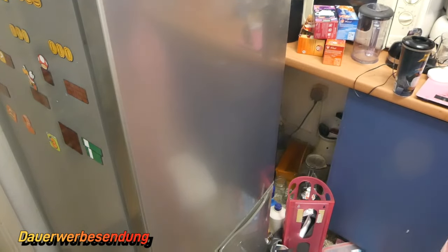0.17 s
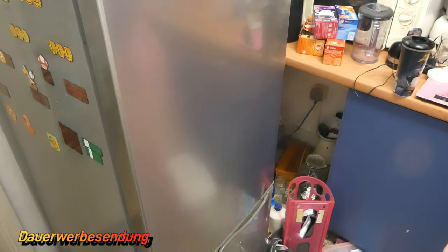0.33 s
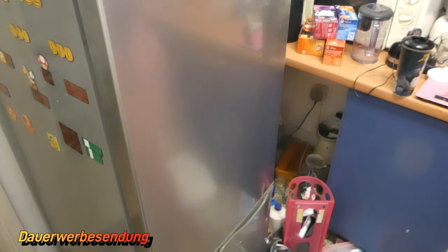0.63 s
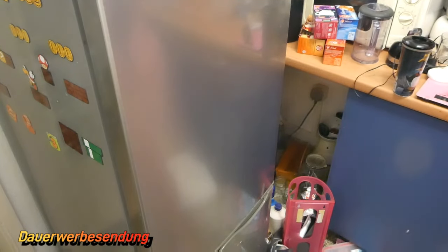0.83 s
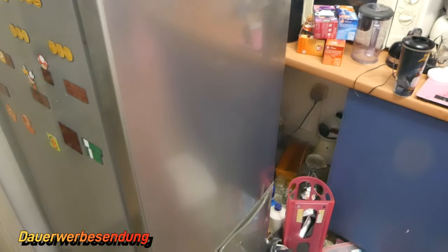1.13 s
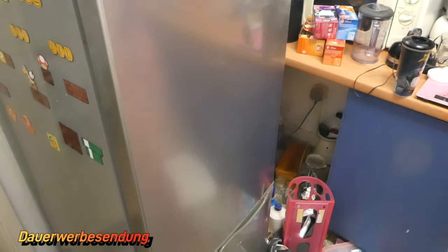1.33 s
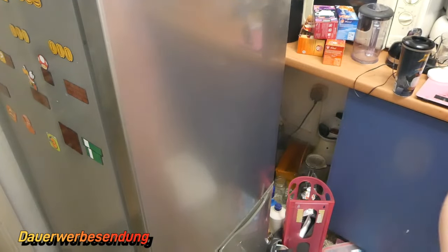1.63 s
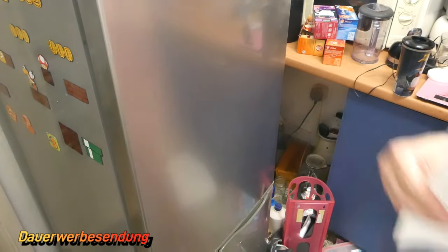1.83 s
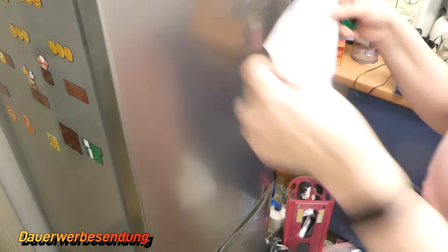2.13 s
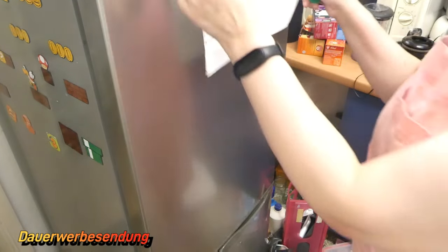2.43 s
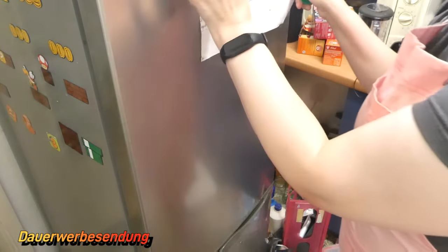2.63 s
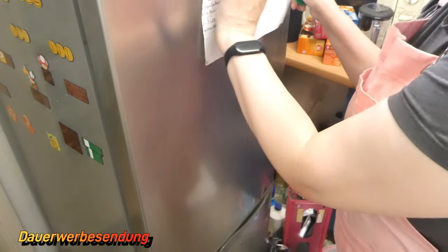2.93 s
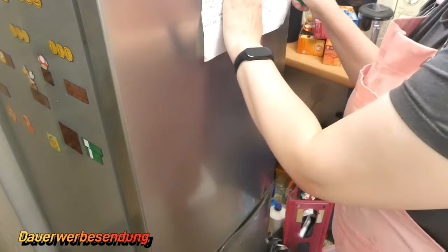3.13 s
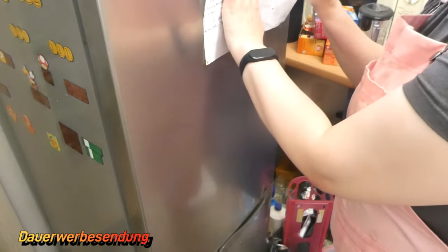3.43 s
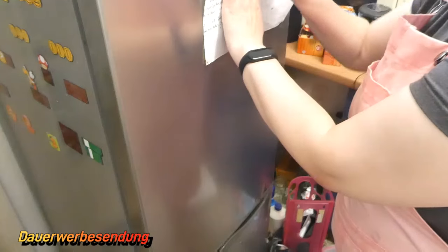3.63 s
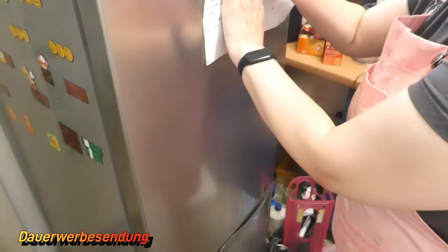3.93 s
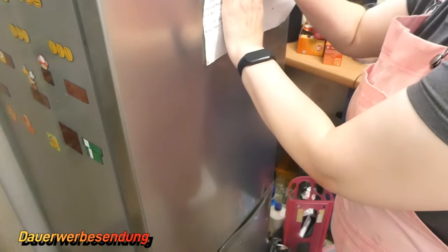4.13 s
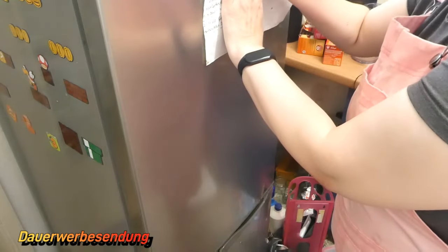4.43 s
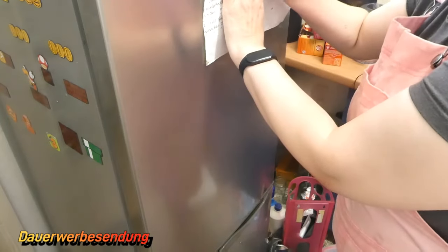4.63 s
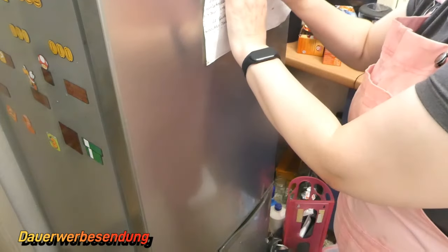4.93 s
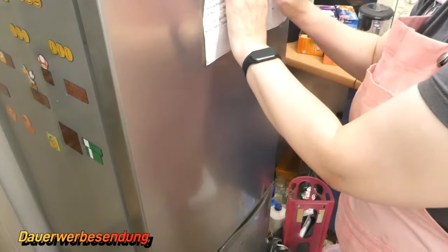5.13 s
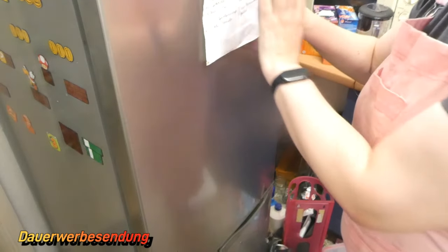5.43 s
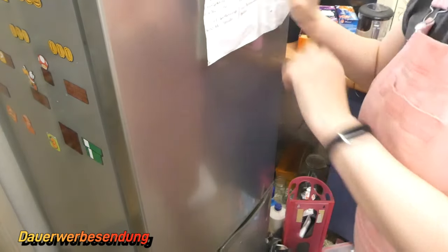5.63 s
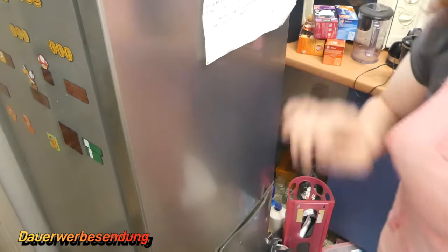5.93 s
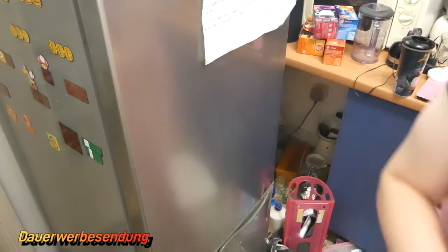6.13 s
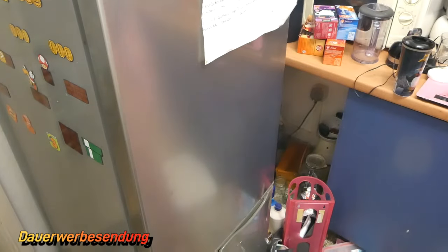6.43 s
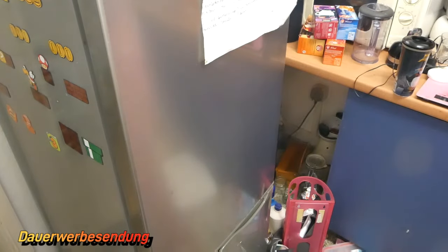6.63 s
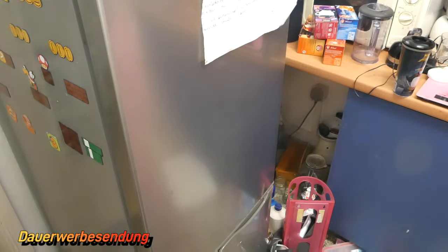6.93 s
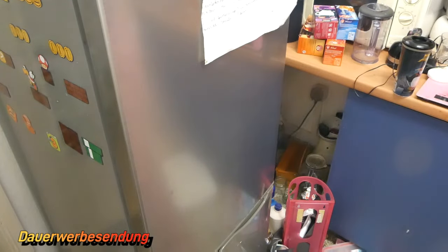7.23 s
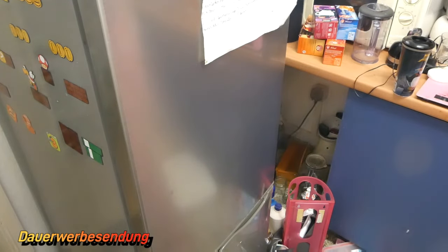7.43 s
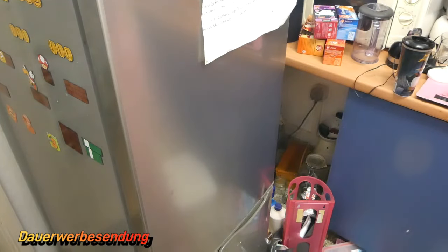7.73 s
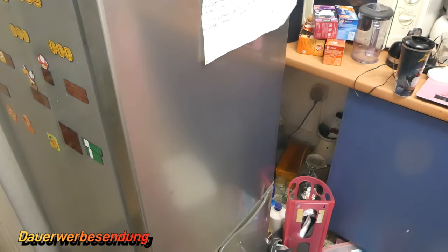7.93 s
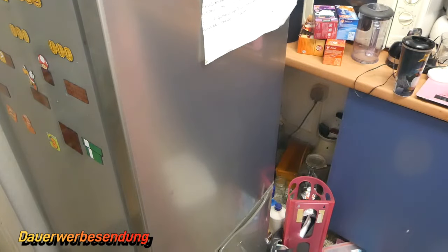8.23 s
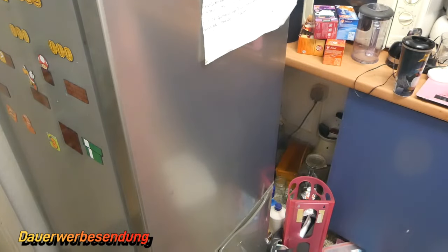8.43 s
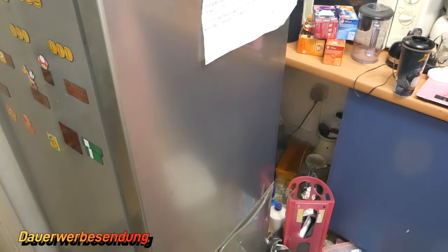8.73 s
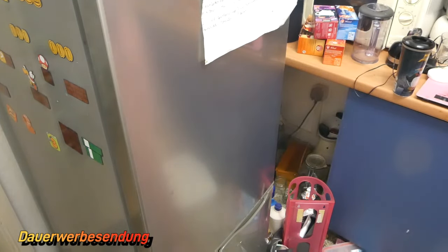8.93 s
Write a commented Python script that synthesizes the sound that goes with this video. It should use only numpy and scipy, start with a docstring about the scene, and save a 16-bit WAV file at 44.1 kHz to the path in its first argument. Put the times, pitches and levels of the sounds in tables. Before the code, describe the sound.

A faint, low, steady hiss fills a small hard-walled kitchen with a short, bright reverberation. At 0-0.25 s something scrapes briefly over the worktop; soft knocks follow at about 0.5 and 0.65 s, then several between 1.4 and 2.4 s. From 1.7 to 2.5 s a sheet of paper rustles, with dry ticks and hollow plips close to the microphone. Hand strokes smooth it from 2.5 to 3.4 s, with sharp ticks; at 3.9 s a magnet claps on the steel door. Faint strokes continue to 5.3 s, then clothes rub softly around 5.7 s. At 6.6 s a large hollow box slides and bangs loudly, clattering with a pitched bowl knock at 6.8 s, and slams hardest at 7.23 s with a dull thump. Thin plastic crinkles, small knocks fall around 7.7-8.2 s, and ringing box blows return from 8.4 to 9 s.

```python
"""A small, hard-walled kitchen, over a faint steady hiss. First something is dragged briefly over the worktop
and small things are knocked or set down. A sheet of paper is carried to the fridge door, smoothed by hand and
pinned with a clapping magnet, with dry ticks close to the microphone. Clothes rustle; then, off to one side, a
large hollow box (a bin or drawer) slides, clatters, slams once, a plastic bag rustles and it clatters again.
Streams of random slips make the rubbing; bursts of contacts, damped modes and room tails make the blows."""
import sys
import numpy as np
from scipy import signal
from scipy.fft import rfft, irfft
from scipy.io import wavfile
from scipy.ndimage import uniform_filter1d

SR = 44100
rng = np.random.default_rng(int(sys.argv[2]) if len(sys.argv) > 2 else 0)


def output_pcm(signal):
    """Save a mono or channel-first signal as 16-bit PCM at the path in sys.argv[1].

    Samples are clipped to [-1, 1] before scaling.
    """
    pcm = np.clip(np.atleast_2d(signal).T, -1, 1) * 32767
    wavfile.write(sys.argv[1], SR, np.round(pcm).astype(np.int16))


N = 399987
SIZE = 32768  # length of one event or room tail (samples)
AGE = np.arange(SIZE) / SR  # time since the event began (s)
FREQ = np.fft.rfftfreq(SIZE, 1 / SR)
TOP_HZ = 15300

# All spectra and mode levels are relative. Modes are later detuned and scattered in level at random,
# and those above 2600 Hz die sooner than listed.

# corners of the lean: low end, boom, body, presence, treble: (frequency [Hz])
LEAN_HZ = (70, 200, 800, 2200, 7000)
# band in which the level of a rustle is set: (lowest [Hz], highest [Hz])
TREBLE_HZ = (7500, 14000)
# reverberation of the kitchen: (frequency [Hz], t60 [s])
ROOM = [(140, 0.75), (300, 0.58), (800, 0.36), (2300, 0.45), (5500, 0.49), (12000, 0.19)]

# hiss common to both sides: (frequency [Hz], level [dB])
HISS_MID = [(18, -50), (30, -21), (110, -9), (267, 1.5), (524, -3), (978, -11.5), (1200, -11.5),
            (1780, -9.5), (2030, -7.5), (2310, -15), (2490, -10.5), (3880, -18), (8040, -20), (9640, -17.5),
            (15000, -28)]
# hiss opposed between the sides: (frequency [Hz], level [dB])
HISS_SIDE = [(18, -61), (30, -29), (59, -20.5), (195, -1), (304, 0.5), (597, -4.5), (1440, -16),
             (2030, -18.5), (3410, -27.5), (5300, -31), (7830, -35.5), (10200, -32.5), (15000, -38.5)]
# narrow whistling bands in the hiss: (frequency [Hz], width [Hz], level [dB])
HISS_PEAKS = [(2024, 120, 0.5), (2485, 89, 0.5), (2880, 60, -3)]

# something dragged over the worktop: (time [s], level [dB])
DRAG = [(0, -51), (.04, -51), (.085, -45.5), (.125, -47), (.155, -42.5), (.19, -48), (.24, -58.5),
        (.4, -76)]
# what it radiates, with one strong resonance: (frequency [Hz], level [dB])
DRAG_TONE = [(80, -34), (140, -7.5), (260, -14), (620, -7.5), (780, -1), (930, -8.5), (1700, -10),
             (2900, -21), (4000, -34), (6000, -32), (6700, -27), (7800, -52)]

# small things knocked or set down: (time [s], level [dB], chatter [s], body [dB], treble [dB])
KNOCKS = [(0.522, -41, .024, -1, -9.5), (0.641, -40, 0.017, -1, -4.5), (1.387, -38, 0.003, 0.5, 3),
          (1.644, -41.5, 0.0023, 0.5, -10.5), (1.767, -41, 0.016, 7, 3), (1.822, -43.5, 0.029, 0, -7),
          (1.975, -46, 0.029, 5, -1), (2.017, -44.5, 0.0041, -15, -17), (2.288, -36, 0.0083, -7, -10.5),
          (2.354, -51.5, 0.0069, 6, -18), (6.814, -34.5, 0.00538, 3, 4), (7.692, -44, 0.0053, 14, -5),
          (7.856, -44, 0.0028, 11, -1), (8.051, -40, 0.0015, -3, -3), (8.18, -43.5, 0.0087, -6.5, -16)]
# what they radiate: (frequency [Hz], level [dB])
KNOCK_TONE = [(105, -35.5), (140, -2.5), (210, -8.5), (320, -2), (510, 1), (810, 0), (1220, -2.5),
              (1770, 0.5), (2470, -3), (3490, -8.5), (5020, -16), (6930, -15.5), (9380, -30), (12850, -28)]
# their boom (dB), the share of the body that it follows, the crack over the room (dB)
KNOCK_BOOM_DB, BOOM_SHARE, KNOCK_CRACK_DB = -5.5, 1, -8

# close, dry ticks and hollow plips: (time [s], peak [dB], pitch [Hz], width [Hz])
TICKS = [(1.333, -41, 420, 300), (1.453, -37.5, 582, 25), (1.898, -33, 580, 100), (2.017, -28.5, 2310, 900),
         (2.679, -34.5, 410, 130), (2.758, -32, 2000, 1000), (2.865, -30.5, 8500, 5000),
         (2.895, -30, 2160, 1100), (3.15, -32, 2100, 1200), (3.361, -31.5, 3750, 3000),
         (3.887, -32, 4750, 2500), (3.888, -28.5, 9750, 4000), (4.953, -39.5, 9500, 5000),
         (5.112, -43, 607, 75), (6.171, -43, 562, 36)]

# what rubbing surfaces radiate: (frequency [Hz], level [dB])
SWISH_TONE = [(105, -29), (140, -17), (210, 0.5), (320, -8), (510, -1.5), (810, -11.5), (1220, -5.5),
              (1770, -2.5), (2470, 1), (3490, -2.5), (5020, -4), (6930, -5.5), (9380, -0.5), (12850, -9)]
# the sheet carried to the door: (time [s], level of its treble before a gain [dB])
CARRY = [(1.72, -65), (1.784, -53.5), (1.934, -59), (2.002, -56), (2.266, -59), (2.322, -56), (2.53, -73)]
# hand strokes over the paper: (time at the middle [s], level there [dB], half length [s], treble [dB])
STROKES = [(2.576, -53, 0.036, -9), (2.737, -49.5, 0.054, -11.5), (2.855, -39, 0.016, -7),
           (2.988, -46, 0.027, 4), (3.098, -45.5, 0.03, 14), (3.163, -42.5, 0.028, -4.5),
           (3.255, -48, 0.019, 8), (3.353, -45, 0.036, -2.5), (3.796, -61, 0.033, 21),
           (4.303, -61, .02, 15), (4.535, -57, 0.054, 6), (4.967, -64, .015, 23), (5.327, -57, .03, 11)]
# softer strokes are given more boom and body, louder ones less: lean of a usual stroke (dB)
# and its fall (dB per dB of level)
USUAL_STROKE_DB, STROKE_BOOM_DB, STROKE_BODY_DB, STROKE_FALL = -48, 3.5, 2, 1
# the magnet slapping onto the steel door through the paper: (frequency [Hz], level [dB])
MAGNET_TONE = [(53, -65), (90, -52), (233, -4), (412, -15), (477, -16), (542, -7), (728, -2.5), (809, -15),
               (999, 1), (1210, -7), (1290, 0), (2050, -6.5), (3470, -28.5), (10600, -22.5), (14000, -28)]
# clothes as the person turns away: (time [s], level of their treble before a gain [dB])
CLOTHES = [(5.42, -73), (5.64, -64.5), (5.668, -62), (5.688, -62.5), (6.52, -74)]

# the bag stirred, pulled about, then settling: (time [s], level of its treble before a gain [dB])
BAG = [(6.839, -63), (6.93, -58), (7.45, -56), (7.682, -56.5), (7.9, -47), (7.97, -52), (8.24, -52.5),
       (8.31, -42), (8.41, -43.5), (8.48, -59.5), (8.72, -62.5), (9.06, -57.5)]
# creases of the bag: lowest and highest pitch (Hz), time to the crest of a click's envelope (s),
# crest above the bag's curve and its spread (dB)
CREASE_LOW_HZ, CREASE_HIGH_HZ, CREASE_S, CREASE_DB, CREASE_SPREAD_DB = 1030, 3900, 0.00026, 16, 1

# a bowl jolted during the clatter: (frequency [Hz], level [dB], t60 [s])
BOWL_MODES = [(392, -1, 0.26), (920, -3, 0.29), (1710, -6, 0.27)]

# the box sliding just before its first blow: (time [s], level of its treble before a gain [dB])
SLIDE = [(6.55, -72), (6.59, -53.5), (6.62, -59)]
# blows on the box; boom is the extra low-end weight of each blow, up or down:
# (time [s], level [dB], chatter [s], boom [dB])
BOX_BLOWS = [(6.594, -19, 0.034, 0.5), (6.701, -32.5, 0.018, 6), (6.75, -32, 0.013, 3),
             (6.901, -23.5, .018, 0), (6.953, -34, 0.01, 4), (7.008, -35.5, .008, -3),
             (7.039, -22, .008, 2), (7.141, -25, .028, -1.5), (7.234, -14.5, 0.001596, -7.5),
             (7.541, -41.5, 0.002, -2), (8.38, -28.5, 0.0035, -7), (8.404, -18.5, .022, 4),
             (8.514, -32, 0.028, 1), (8.756, -32, 0.0071, -3.5), (8.86, -41, 0.00195, -4.5),
             (8.942, -35, 0.012, -8.5), (9.013, -32.5, 0.014, 0)]
# what the box radiates: (frequency [Hz], level [dB])
BOX_TONE = [(45, -53), (105, -26), (140, -7), (210, -3), (320, -4.5), (510, -2.5), (810, 1.5), (1220, -2),
            (1770, -1), (2470, -3), (3490, -11.5), (5020, -16), (6930, -26.5), (9380, -24), (12850, -34.5)]
# ringing of the box and its contents: (frequency [Hz], level [dB], t60 [s])
BOX_MODES = [(143.4, 11, 0.79), (191.6, 7, 0.63), (266.8, 5, 0.39), (325, 6, 0.67), (764, 0.5, 0.63),
             (795, -5.5, 0.74), (865, 5.5, 0.26), (1003, 4, 0.54), (1098, 7.5, 0.24), (1182, 6.5, 0.26),
             (1380, -23, 0.48), (1744, -11, 0.16), (1835, 7.5, 0.14), (2115, 6, 0.45), (2310, 5, 0.79),
             (2460, 6, 0.26), (2980, -11, 0.33), (3135, 11, 0.82), (3320, 15.5, 1), (3700, 9, 0.94),
             (3870, 12, 1), (4160, 18, 0.61), (4400, 5, 1), (5180, 5, 0.82)]
# a metal part on the box that sings on after each blow: (frequency [Hz], level [dB], t60 [s])
METAL_MODES = [(2363, 2, 0.16), (2450, 1, 0.5), (2460, 1, 0.8), (2555, -2.5, 0.45), (2530, -15, 0.72),
               (2800, -24, 0.69)]
# left over right for the box: (frequency [Hz], difference [dB])
BOX_BALANCE = [(200, 2), (400, -0.2), (700, -3), (1300, -3), (4400, -0.5), (12000, 0)]
# a blow of middling strength: its level, its boom, body and treble, and its crack over the room (dB)
MIDDLING_DB, BOX_BOOM_DB, BOX_BODY_DB, BOX_TREBLE_DB, BOX_CRACK_DB = -30.5, 3, -1, -5.5, -16.5
# a harder blow has a shorter contact: less boom and body, more treble and crack,
# and it shakes the metal part more (all dB per dB of strength)
BOOM_FALL, BODY_FALL, TREBLE_RISE, CRACK_RISE, METAL_RISE = 0.8, 0.31, 0.3, 0.71, 0.25
# loose things in the box: lowest and highest pitch (Hz), ring time (s), relative level (dB)
LOOSE_LOW_HZ, LOOSE_HIGH_HZ, LOOSE_T60_S, LOOSE_DB = 330.3, 4420, 0.28, -22.5


def undb(db):
    """Decibels to gain."""
    return 10 ** (np.asarray(db) / 20)


def rms(x):
    """Root mean square, kept above zero."""
    return np.sqrt(np.mean(x ** 2)) + 1e-12


def read(points, hz):
    """A table of (frequency [Hz], value) joined on a log-frequency axis."""
    f, value = np.transpose(points)
    return np.interp(np.log(np.maximum(hz, 1)), np.log(f), value)


def tone(points, boom_db, body_db, treble_db):
    """A spectrum in dB, leaned towards boom, body or treble."""
    lean = list(zip(LEAN_HZ, (0, boom_db, body_db, 0, treble_db)))
    return read(points, FREQ) + read(lean, FREQ)


def colour(x, db):
    """Causal (minimum-phase) filter with the given gain, so that attacks stay sharp."""
    cepstrum = irfft(np.log(undb(db)))
    cepstrum[1:SIZE // 2] *= 2
    cepstrum[SIZE // 2 + 1:] = 0
    return irfft(rfft(x) * np.exp(rfft(cepstrum)))


def stereo(mid, side):
    """Left and right from what they share and what opposes them."""
    return np.array([mid + side, mid - side])


def add(out, s, x):
    """Mix a sound in at a time, cut to the length of the scene."""
    start = int(s * SR)
    lo, hi = max(start, 0), min(start + x.shape[-1], N)
    out[:, lo:hi] += x[..., lo - start:hi - start]


def loudness(x, db):
    """Scale a blow so that its first twentieth of a second has this level."""
    return x * undb(db) / rms(x[:, :SR // 20])


def room_tail(side_low=.38, side_mid=0.33, side_high=0.5):
    """Dense reflections of unit energy: lows linger, the treble differs most between the two sides."""
    width = read([(300, side_low), (2000, side_mid), (11000, side_high)], FREQ)
    mid, side = rfft(rng.standard_normal((2, SIZE)))
    field, tail = stereo(mid, width * side), 0
    centres, t60s = np.transpose(ROOM)
    # each row of the identity picks one band, which overlaps its neighbours
    for share, t60 in zip(np.eye(len(ROOM)), t60s):
        band = irfft(field * read(list(zip(centres, share)), FREQ))
        tail = tail + band * np.exp(-np.log(1000) * AGE / t60)
    return tail / (rms(tail) * np.sqrt(SIZE))


def in_room(close, room_db):
    """The close sound plus its reflections from the kitchen."""
    return close + undb(room_db) * signal.fftconvolve(close, room_tail(), axes=1)[:, :N]


def contacts(chatter_s, count=7, first=1.0):
    """A first touch and a few bounces scattered through the chatter time; unit energy."""
    when, size = rng.random((2, count))
    when = (np.arange(count) + when) / count * max(chatter_s, 0)
    size = (.5 + size) * rng.choice([-1, 1], count)
    when[0], size[0] = 0, first
    force = np.bincount((when * SR).astype(int), size, SIZE)[:SIZE]
    return force / np.linalg.norm(force)


def blow(chatter_s, crack_db, crack_s=0.0029, build_s=0.0027, shadow_hz=5000):
    """Each contact sends a short crack to the microphone and adds its energy to the room."""
    force = contacts(chatter_s)
    crack = rng.standard_normal(SIZE) * np.exp(-AGE / crack_s)
    cracks = irfft(rfft(force) * rfft(crack))
    # the top of the crack is shadowed and arrives only by way of the walls
    direct = colour(cracks, -10 * np.log10(1 + (FREQ / shadow_hz) ** 4))
    filling = np.sqrt(np.cumsum(force ** 2)) * (1 - np.exp(-AGE / build_s))
    x = undb(crack_db) * direct / np.linalg.norm(direct) + filling * room_tail()
    return x / (rms(x) * np.sqrt(SIZE))


def ringing(modes, detune=0.00366, scatter_db=2.54):
    """Damped modes; the pitch and level of each are scattered at random on every call."""
    hz, db, t60 = np.transpose(modes)
    t60 = t60 * np.minimum(1, 2600 / hz) ** 2  # losses grow quickly in the treble
    shift, share = rng.standard_normal((2, len(hz)))
    phase = np.outer(2 * np.pi * hz * (1 + detune * shift), AGE).astype(np.float32)
    decay = np.maximum(np.outer(-np.log(1000) / t60, AGE), -20).astype(np.float32)
    rings = np.sin(phase) * np.exp(decay)
    # before the scatter, a mode at 0 dB has unit energy
    size = undb(db + scatter_db * share) * rng.choice([-1, 1], len(hz)) / np.linalg.norm(rings, axis=1)
    return np.einsum("m,mt->t", size, rings)


def slips(size, grain_db, side, top_spread=0.21):
    """Countless tiny slips of uneven size, spread between left and right, most widely in the top treble."""
    mid, opposed = rng.standard_normal((2, size)) * undb(grain_db * rng.exponential(size=size))
    return stereo(mid, side * (opposed - top_spread * np.roll(opposed, 1)))


def rustle(curve, boom_db, body_db, treble_db, grain_db, side, gain_db,
           catch_db=1.2, catch_s=.012, fade_s=0.0033):
    """A surface in motion: a stream of slips follows the curve, catching and freeing itself at random."""
    f, t = np.fft.rfftfreq(N, 1 / SR), np.arange(N) / SR
    gain = undb(np.interp(f, FREQ, tone(SWISH_TONE, boom_db, body_db, treble_db)))
    spectrum = rfft(slips(N, grain_db, side)) * gain
    treble = irfft(spectrum.mean(axis=0) * (f > TREBLE_HZ[0]) * (f < TREBLE_HZ[1]), N)
    catches = catch_db * rng.standard_normal(N)[(t / catch_s).astype(int)]
    level = np.interp(t, *np.transpose(curve), left=-np.inf, right=-np.inf)
    motion = undb(gain_db + catches + level)
    return irfft(spectrum, N) / rms(treble) * uniform_filter1d(motion, int(fade_s * SR) + 1)


def hiss(mid_db=-59.0, side_db=-51.0, whistle_db=-66):
    """Steady background of shaped noise: a wide low rush, a thin hiss and a few narrow bands."""
    f = np.fft.rfftfreq(N, 1 / SR)
    peaks = sum(undb(db) / (1 + (2 * (f - hz) / width) ** 2) for hz, width, db in HISS_PEAKS)
    shapes = np.array([undb(read(HISS_MID, f)), undb(read(HISS_SIDE, f)), peaks, peaks])
    noises = irfft(rfft(rng.standard_normal((4, N))) * shapes, N)
    mid, side, left, right = (x / rms(x) for x in noises)
    whistles = undb(whistle_db) * np.array([left, right])
    return stereo(undb(mid_db) * mid, undb(side_db) * side) + whistles


def clothes():
    """Cloth rubs on cloth: a soft stream of slips, weak in treble."""
    return rustle(CLOTHES, boom_db=9, body_db=5.5, treble_db=-10.0, grain_db=1.4, side=0.47, gain_db=-1.6)


def drag(grain_db=-2.5, side=0.41):
    """Stick and slip: a stream of uneven clicks rings the dragged thing."""
    clicks = rng.standard_normal((2, SIZE)) * undb(grain_db * rng.exponential(size=SIZE))
    x = colour(stereo(clicks[0], side * clicks[1]), read(DRAG_TONE, FREQ))
    out = np.zeros((2, N))
    add(out, 0, x / rms(x) * undb(np.interp(AGE, *np.transpose(DRAG), right=-np.inf)))
    return out


def knocks(pan_db=-2):
    """Small, well damped things: a crack or short rattle, and the room does the rest."""
    out = np.zeros((2, N))
    for s, db, chatter_s, body_db, treble_db in KNOCKS:
        touch = tone(KNOCK_TONE, KNOCK_BOOM_DB + BOOM_SHARE * body_db, body_db, treble_db)
        add(out, s, loudness(colour(blow(chatter_s, KNOCK_CRACK_DB), touch), db))
    return out * undb([[pan_db / 2], [-pan_db / 2]])  # left over right


def ticks(snap_s=0.0033, room_db=-10):
    """A tiny snap rings one resonance: wide for a paper tick, narrow for a plip."""
    out = np.zeros((2, N))
    for s, db, hz, width_hz in TICKS:
        snap = rng.standard_normal(SIZE) * np.exp(-AGE / snap_s)
        ring = np.cos(2 * np.pi * hz * AGE) * np.exp(-np.pi * width_hz * AGE)
        # a small source radiates little bass
        x = irfft(rfft(snap) * rfft(ring) * FREQ / (FREQ - 1j * hz / 2))
        x = irfft(rfft(x) / (1 + 1j * FREQ / (2 * hz)))  # nor much far above its resonance
        add(out, s, x * undb(db) / np.abs(x).max())
    return in_room(out, room_db)


def carried_sheet():
    """The carried sheet rustles as a stream of grainy slips."""
    return rustle(CARRY, boom_db=-12, body_db=9, treble_db=-6, grain_db=2.4, side=0.56, gain_db=-4.5)


def strokes(grain_db=2.0, side=0.35):
    """Paper slides on the door: the slips swell and fade with each stroke of the hand."""
    out, middle = np.zeros((2, N)), AGE[-1] / 2
    for s, db, half_s, treble_db in STROKES:
        softness = STROKE_FALL * (USUAL_STROKE_DB - db)
        touch = tone(SWISH_TONE, STROKE_BOOM_DB + softness, STROKE_BODY_DB + softness, treble_db)
        x = colour(slips(SIZE, grain_db, side), touch)
        swell = np.exp(-.5 * ((AGE - middle) / half_s) ** 2)
        add(out, s - middle, x * undb(db) / rms(x) * swell)
    return out


def magnet(db=-31.5, chatter_s=.011, crack_db=-2):
    """The magnet claps on the door panel in a short burst of contacts, with the room's reply."""
    out = np.zeros((2, N))
    clap = loudness(colour(blow(chatter_s, crack_db), read(MAGNET_TONE, FREQ)), db)
    add(out, 3.896, clap)
    return out


def bowl(db=-33.0):
    """One short, pitched knock amid the clatter, from a few damped modes."""
    out = np.zeros((2, N))
    ring = loudness(np.tile(ringing(BOWL_MODES), (2, 1)), db)
    add(out, 6.815, ring)
    return out


def bag():
    """Thin plastic rubs on itself: a stream of slips that follows the stirring."""
    return rustle(BAG, boom_db=-2, body_db=5.5, treble_db=-2.5, grain_db=1.76, side=0.55, gain_db=-0.1)


def creases(count=110, room_db=2):
    """Creases snap at random moments, as loud as the bag is stirred: each is a click of about one cycle."""
    out, age = np.zeros((2, N)), AGE[:SR // 50]
    times, levels = np.transpose(BAG)
    for (when, pitch), size in zip(rng.random((count, 2)), rng.standard_normal(count)):
        s = times[0] + when * (times[-1] - times[0])
        hz = CREASE_LOW_HZ * (CREASE_HIGH_HZ / CREASE_LOW_HZ) ** pitch
        db = np.interp(s, times, levels) + CREASE_DB + CREASE_SPREAD_DB * size
        envelope = age / CREASE_S * np.exp(1 - age / CREASE_S)
        add(out, s, undb(db) * np.sin(2 * np.pi * hz * age) * envelope)
    return in_room(out, room_db)


def sliding_box():
    """The box starts to slide: a stream of slips, strong in the body."""
    return rustle(SLIDE, boom_db=-3, body_db=13.5, treble_db=-9.5, grain_db=4.5, side=.4, gain_db=2.7)


def swishes(room_db=-9):
    """All that rubs (paper, clothes, sliding box and bag) excites the same room."""
    return in_room(carried_sheet() + strokes() + clothes() + sliding_box() + bag(), room_db)


def loose_things(count=14):
    """Things loose in the box: a random handful of briefly ringing modes, different on each blow."""
    hz = LOOSE_LOW_HZ * (LOOSE_HIGH_HZ / LOOSE_LOW_HZ) ** rng.random(count)
    return ringing([(f, LOOSE_DB, LOOSE_T60_S) for f in hz])


def box(ring_db=-27, damping_db=-9, metal_db=-24, body_share=0.5):
    """The hollow box chatters, brighter when hit harder; walls and contents ring, a metal part sings on."""
    out = np.zeros((2, N))
    lean = read(BOX_BALANCE, FREQ) / 2
    damping = undb(read([(2000, 0), (3500, damping_db)], FREQ))  # the walls radiate their high modes poorly
    for s, db, chatter_s, boom_db in BOX_BLOWS:
        strength = db - MIDDLING_DB
        boom = BOX_BOOM_DB - BOOM_FALL * strength + boom_db
        body = BOX_BODY_DB - BODY_FALL * strength + body_share * boom_db
        touch = tone(BOX_TONE, boom, body, BOX_TREBLE_DB + TREBLE_RISE * strength)
        walls = undb(ring_db) * irfft(rfft(ringing(BOX_MODES)) * damping)
        metal = undb(metal_db + METAL_RISE * strength) * ringing(METAL_MODES)
        clatter = blow(chatter_s, BOX_CRACK_DB + CRACK_RISE * strength)
        x = colour(clatter + walls + metal + loose_things(), touch)
        placed = irfft(rfft(x) * undb([lean, -lean]))
        add(out, s, loudness(placed, db))
    return out


def scene():
    """Everything in the kitchen, from the background to the box."""
    return hiss() + drag() + knocks() + ticks() + swishes() + magnet() + bowl() + creases() + box()


def record(dry, lopsided=0.13, ceiling=0.87):
    """The microphone bends the highest peaks unevenly, which gives the slam a dull thump; the top is cut."""
    bent = np.clip(dry + lopsided * dry ** 2, -ceiling, ceiling)
    return signal.sosfilt(signal.ellip(10, .1, 70, TOP_HZ, fs=SR, output="sos"), bent)


dry = scene()
out = record(dry)
output_pcm(out)
```